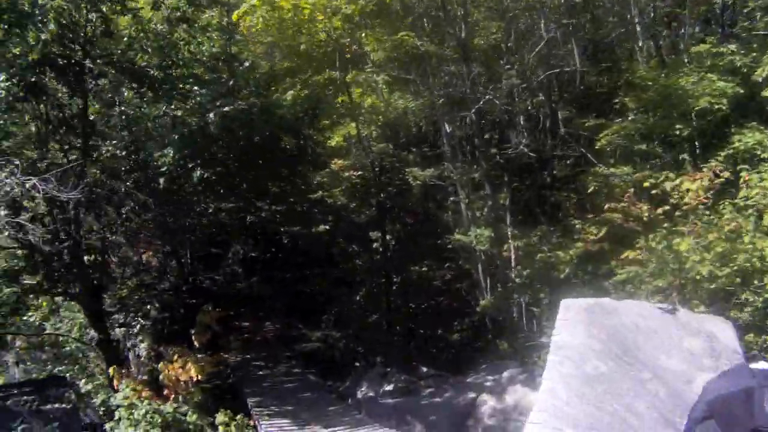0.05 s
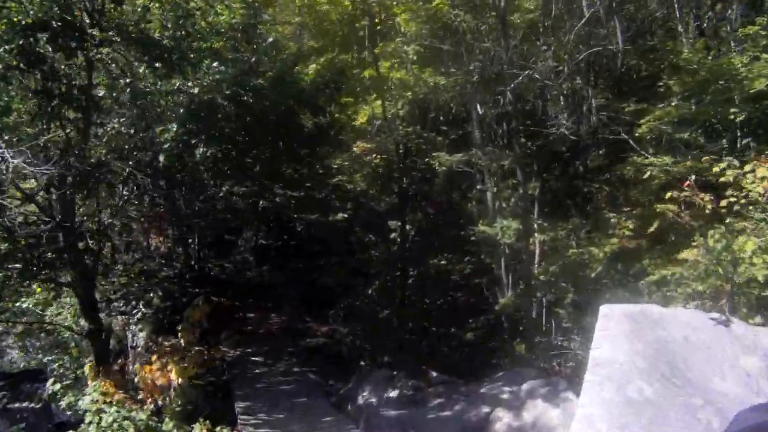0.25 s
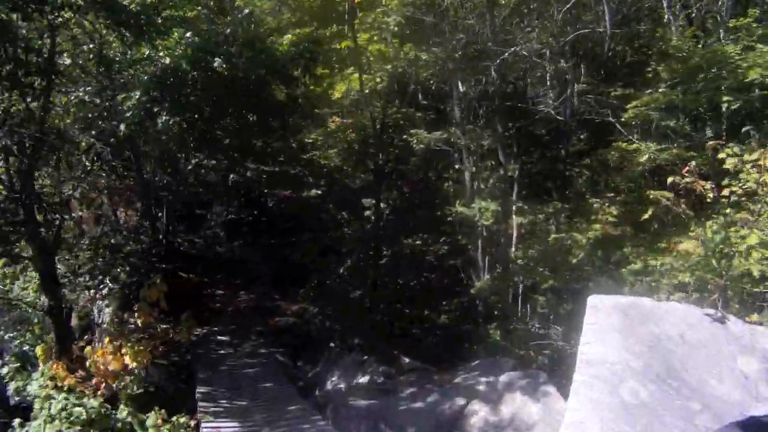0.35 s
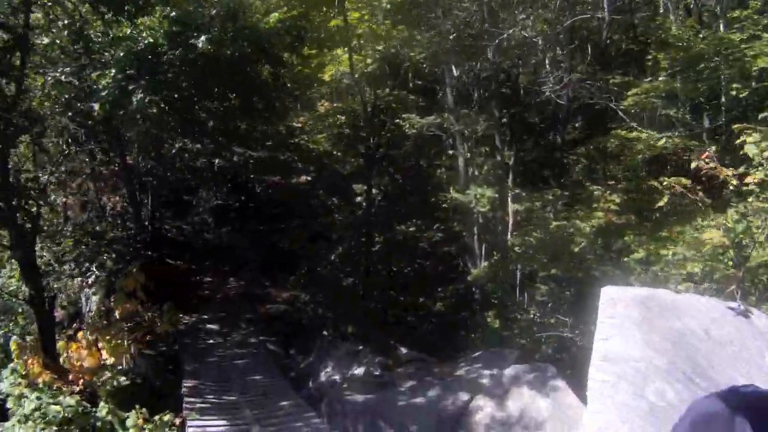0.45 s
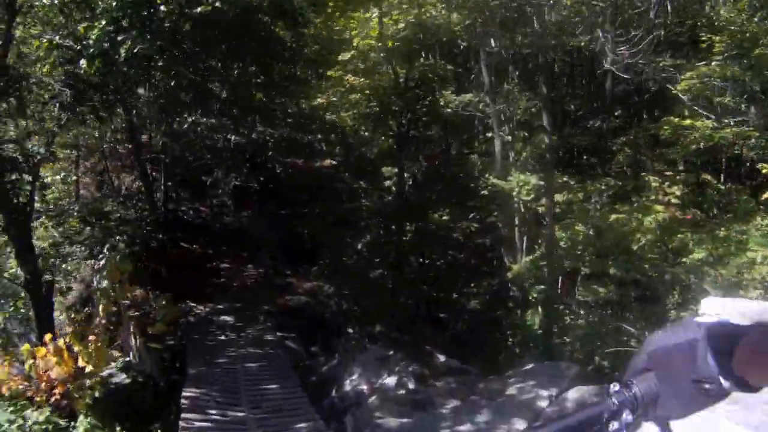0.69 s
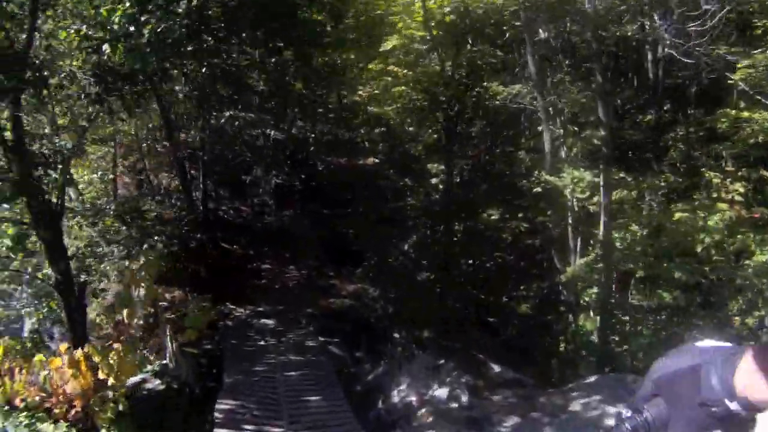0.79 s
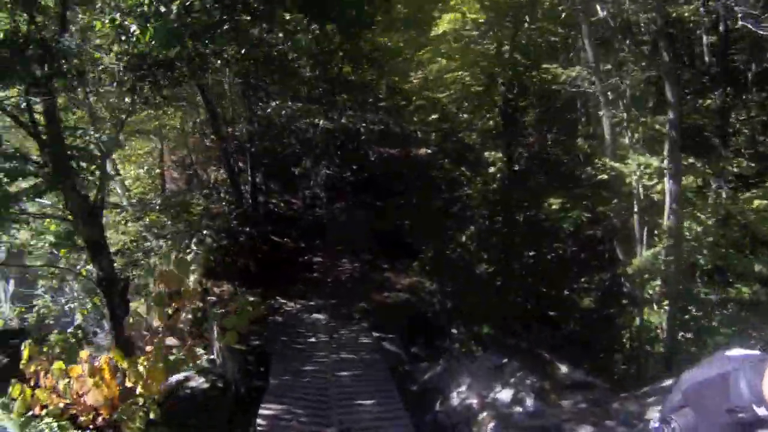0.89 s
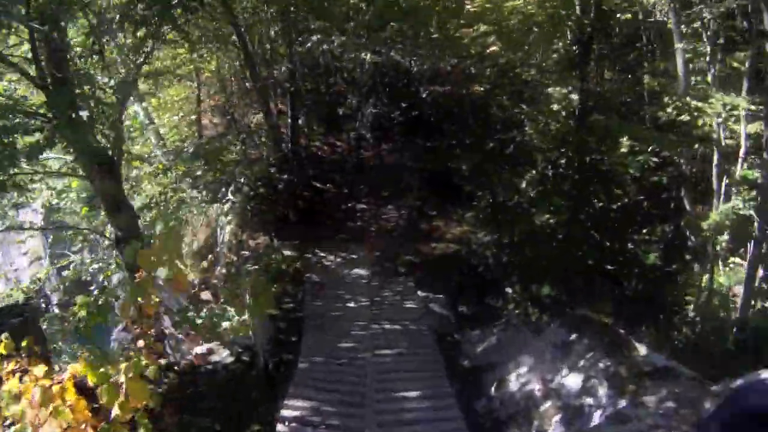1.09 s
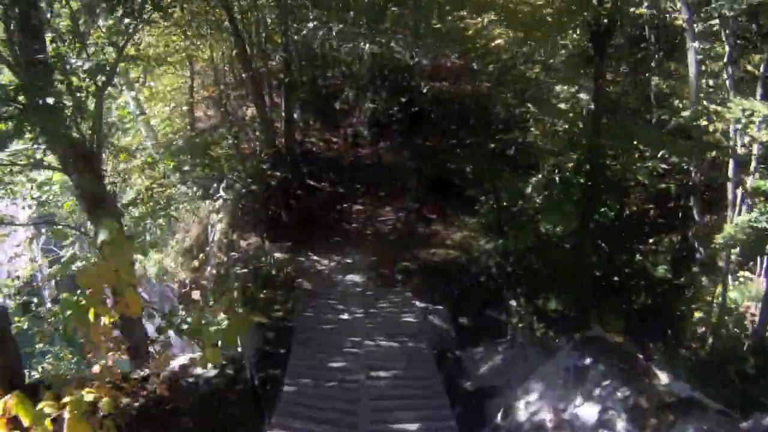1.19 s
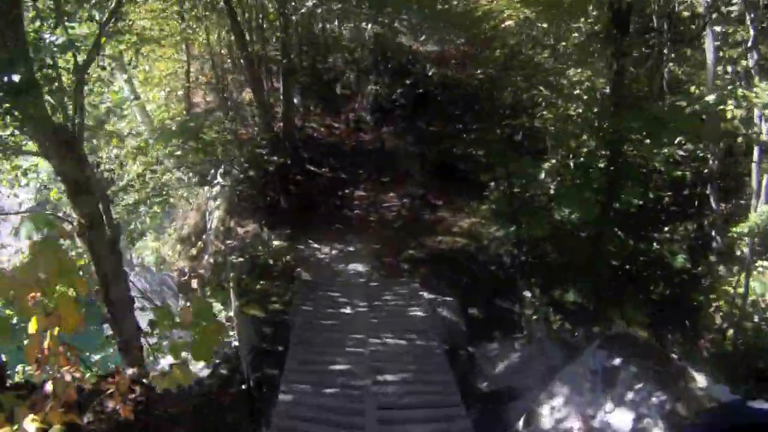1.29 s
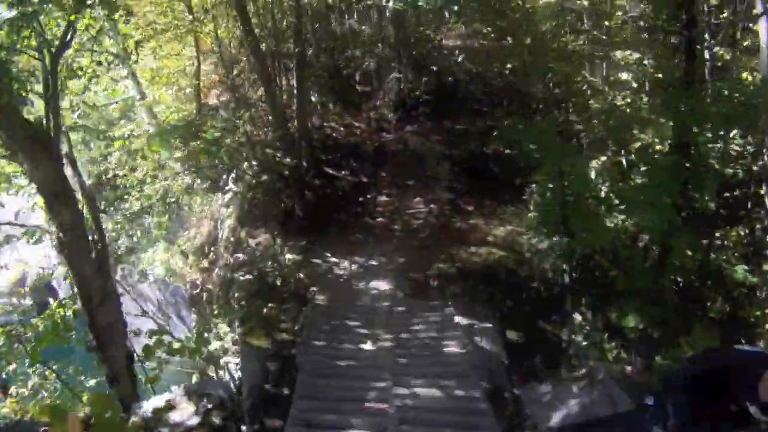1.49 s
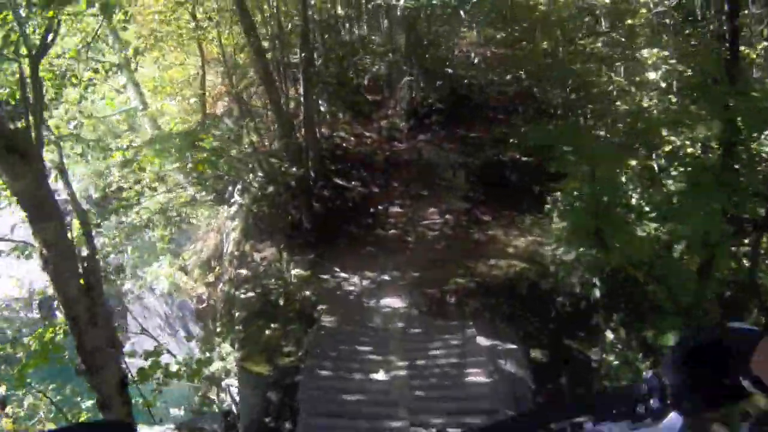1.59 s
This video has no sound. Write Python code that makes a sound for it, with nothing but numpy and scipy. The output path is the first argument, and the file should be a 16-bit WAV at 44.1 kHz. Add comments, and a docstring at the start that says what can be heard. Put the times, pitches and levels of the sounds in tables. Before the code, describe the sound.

Mountain bike tyres rush and crunch in surges over a rocky trail, heard close and slightly boxy, with wind and vibration rumbling underneath. Two deep thumps hit the microphone at about 0.3 and 0.4 seconds. Dull knocks and small ticks rattle from 0.7 seconds on. Around 1.3 seconds the tyres surge with bright cracks and a chain slap, then roll on more softly until about 1.6 seconds.

```python
"""Mountain bike tyres rush and crunch in surges over a rocky forest trail.
The microphone rides close, in a plastic camera case on the rider, and the case colours the sound.
The tread scuffs on rock, grit and chain tick, the chain slaps the frame and the camera mount knocks.
Right at the microphone, two bumps thump the case; wind and the shaking mount rumble in the bass."""
import sys
import numpy as np
from scipy import signal
from scipy.fft import rfft, irfft, next_fast_len
from scipy.io import wavfile

SR = 44100
rng = np.random.default_rng(int(sys.argv[2]) if len(sys.argv) > 2 else 0)


def wrap_up_sound(samples):
    """Save the sound to the file named by the first command line argument, as 16-bit audio."""
    columns = np.atleast_2d(samples).T
    # keep every value between -1 and 1, then stretch to whole-number steps
    tamed = np.clip(columns, -1, 1)
    steps = np.round(tamed * 32767).astype(np.int16)
    wavfile.write(sys.argv[1], SR, steps)


N = 72765
TIME = np.arange(N) / SR

# resonances of the camera mount: f/Hz, level/dB, t60/s
MOUNT_MODES = [(1177, -3.5, 0.041), (1304, 1, 0.025), (2150, -0.5, 0.034), (2270, -8.5, 0.017),
               (2420, -1, 0.013), (3740, -19, 0.035), (8160, -17.5, 0.034), (9840, -8, 0.032),
               (10740, -12.5, 0.039), (13500, -8.5, 0.019), (15200, -17, 0.023)]


def tyres(grains_per_s=1300, grain_spread_db=5, grit_db=-2, flutter_db=2.3, mount_db=-6):
    """Below the rider, smooth rush and crunching grit swell together and keep the mount ringing faintly."""
    # surges of the tyres on the ground: t/s, level/dB
    surges = [(0, -54.5), (.03, -61.5), (.07, -61), (.11, -59.5), (.14, -60.5), (.17, -56), (.208, -54.5),
              (.228, -61), (.27, -62.5), (.32, -63), (.36, -57), (.41, -58), (.44, -62), (.51, -70),
              (.535, -62.5), (.66, -66.5), (.70, -59), (.732, -57), (.78, -65.5), (.83, -63.5),
              (.87, -59.5), (.925, -60), (1.0, -65.5), (1.08, -61.5), (1.18, -65.5), (1.235, -64.5),
              (1.26, -47), (1.29, -55.5), (1.32, -56.5), (1.36, -54.5), (1.39, -59.5), (1.425, -63.5),
              (1.6, -63.5), (1.65, -62.5)]
    # tyre spectrum as heard inside the case: f/Hz, level/dB
    spectrum = [(250, -2), (380, 1.5), (520, -8), (800, -6), (1030, -4.5), (1250, 1.5), (1620, -7),
                (2120, 2.5), (2500, -0.5), (2780, -6), (3000, -3), (3350, -10.5), (3700, -2.5),
                (4300, -15.5), (5200, -17.5), (5750, -34), (6100, -36), (6800, -19), (7400, -24),
                (8350, -11), (8800, -17.5), (9850, -10.5), (10300, -26), (10700, -26.5), (11300, -25.5),
                (12700, -25.5), (13300, -29), (13650, -19), (14200, -14.5), (15200, -16)]
    swell = level(surges)
    grain_db = grain_spread_db * np.minimum(rng.exponential(1, N), 4)
    grains = from_db(grain_db) * rng.choice([-1, 1], N)
    grit = rms_one(grains * (rng.random(N) < grains_per_s / SR))
    rush = rng.standard_normal(N) * from_db(flutter_db * drift(rate_hz=59))
    ground = colour(swell * (rush + from_db(grit_db) * grit), spectrum)
    mount_ring = rms_one(strike(rng.standard_normal(N), MOUNT_MODES))
    return ground + from_db(mount_db) * swell * mount_ring


def tread_scuffs():
    """Knobs of the tread rasp briefly on rock."""
    # scuffs: t/s, level/dB, length/s
    scuffs = [(0.072, -50.5, 0.013), (0.101, -54.5, 0.017), (0.198, -53, 0.028), (0.355, -52.5, 0.013)]
    # spectrum of the rasp: f/Hz, level/dB
    spectrum = [(1000, -17), (1700, -11), (2130, 11.5), (2600, -15), (3700, -14), (6000, -37), (8500, -22),
                (9850, -9.5), (11500, -33), (14200, -10.5)]
    envelope = sum(from_db(db) * lobe(s, length_s) for s, db, length_s in scuffs)
    return envelope * noise(spectrum)


def grit_and_chain_ticks(decay_s=0.003, tail_s=0.011, tail_db=-15, gain_db=-4.5):
    """Grit and chain give bright cracks with a faint tail."""
    # ticks: t/s, relative level/dB
    ticks = [(0.01, -46), (0.203, -54), (.423, -60), (.833, -54), (0.8625, -45.5), (1.04, -52),
             (1.266, -39.5), (1.276, -51), (1.2862, -44.5), (1.335, -43.5), (1.34, -49), (1.347, -52),
             (1.441, -55), (1.553, -52)]
    # spectrum of a tick: f/Hz, level/dB
    spectrum = [(400, -0.5), (1500, -3.5), (2400, 1), (3700, 0), (4300, -3.5), (5000, 2), (6050, -10),
                (7000, 0), (7700, -8), (9600, -10), (12000, -44), (14500, -10.5)]
    envelope = sum(from_db(db) * (fade(s, decay_s) + from_db(tail_db) * fade(s, tail_s))
                   for s, db in ticks)
    return from_db(gain_db) * colour(envelope * rng.standard_normal(N), spectrum)


def chain_slaps():
    """The chain slaps the frame and sets it ringing."""
    # slaps: t/s, relative level/dB, brightness/Hz, chatter decay/s
    slaps = [(1.3328, -34.5, 11000, 0.0011), (1.3445, -50, 9000, .005)]
    # resonances of the frame: f/Hz, level/dB, t60/s
    frame_modes = [(1311, 2.5, 0.052), (1999, -8.5, 0.059), (2385, 2.5, 0.047), (3030, -3, 0.045),
                   (3110, -0.5, 0.029), (3750, -1.5, 0.032), (4280, -7, 0.0235), (8400, -6, 0.028),
                   (8850, -15, .025), (9130, -7, 0.042), (10660, -10, 0.048), (12860, -12, 0.028),
                   (14200, -16, .02), (14400, -2, .02)]
    return strike(blows(slaps), frame_modes)


def mount_knocks():
    """Dull knocks ring the mount, next to the microphone."""
    # knocks: t/s, relative level/dB, brightness/Hz, chatter decay/s
    knocks = [(.0765, -48, 9000, 0.0032), (.723, -40.5, 5000, .012), (.845, -43, 700, 0.014),
              (.922, -38, 700, .012), (1.017, -35.5, 6040, 0.0038), (1.0215, -45, 6000, 0.0032),
              (1.195, -46.5, 5160, 0.0033), (1.2412, -29, 700, 0.0061), (1.249, -33, 900, .004)]
    return strike(blows(knocks), MOUNT_MODES)


def case_thumps(roundness=1.87, highpass_hz=42.6, highpass_q=0.72, buzz_hz=11940, buzz_db=-34):
    """A bump's low thump undershoots through the microphone's high-pass, and the case rings thinly."""
    # bumps against the case: t/s, push level/dB, direction/sign, push length/s
    bumps = [(0.2965, -13.0, 1, 0.0045), (0.3994, -16, -1, 0.00548)]
    push, clicks = np.zeros(N), np.zeros(N)
    for s, db, direction, push_s in bumps:
        push += direction * from_db(db) * lobe(s, push_s) ** roundness
        clicks += from_db(db + buzz_db) * click(s)
    buzz_band = signal.butter(2, [buzz_hz - 400, buzz_hz + 400], "band", fs=SR, output="sos")
    buzz = signal.sosfilt(buzz_band, ring(clicks, buzz_hz, t60=0.025))
    w = 2 * np.pi * highpass_hz
    mic_highpass = signal.bilinear([1, 0, 0], [1, w / highpass_q, w * w], SR)
    return signal.lfilter(*mic_highpass, push) + buzz


def wind(waver_db=0.6, air_db=-65):
    """Deep gusts buffet the case over a faint, steady rush of air."""
    # gusts on the case: t/s, level/dB
    gusts = [(0, -39), (.07, -52.5), (.25, -53), (.34, -47), (.45, -52), (.57, -52.5), (.635, -53),
             (.68, -51), (.72, -47.5), (.79, -49), (.85, -58), (.91, -43), (.99, -50), (1.07, -47),
             (1.13, -53), (1.21, -47), (1.28, -57), (1.33, -52.5), (1.44, -50.5), (1.6, -57), (1.65, -68)]
    # spectra of the gusts and of the steady air: f/Hz, level/dB
    gust_spectrum = [(10, -7.5), (20, 1.5), (30, 5.5), (48, -11), (80, -22.5), (200, -18.5), (800, -64)]
    air_spectrum = [(200, -1.5), (350, 4), (520, -5.5), (900, -3.5), (1250, -2), (1650, -16.5),
                    (2200, -13.5), (4000, -13.5), (5200, -19), (6000, -27), (7000, -19.5), (9000, -19.5),
                    (12000, -31.5), (15000, -35)]
    waver = from_db(-waver_db * drift(rate_hz=5.8))
    buffeting = level(gusts) * waver * noise(gust_spectrum)
    return buffeting + from_db(air_db) * noise(air_spectrum)


def mount_rumble():
    """The mount shudders over rough ground and wobbles after each jolt."""
    # shudder of the mount: t/s, level/dB
    shudder = [(0, -56.5), (.135, -63), (.155, -52), (.205, -44.5), (.225, -63.5), (.34, -54.5), (.38, -53),
               (.44, -56.5), (.54, -59), (.58, -62), (.69, -61), (.73, -47.5), (.765, -58.5), (.83, -60.5),
               (.92, -55), (.99, -59.5), (1.04, -52), (1.13, -64.5), (1.25, -53.5), (1.345, -57.5),
               (1.38, -46), (1.42, -60.5), (1.6, -67), (1.65, -49.5)]
    # spectrum of the shudder: f/Hz, level/dB
    spectrum = [(35, -14.5), (75, 4), (135, -2.5), (230, -16.5), (340, -6.5), (480, -15.5), (900, -40.5),
                (2000, -60)]
    # jolts and their wobble: t/s, level/dB, f/Hz, t60/s
    jolts = [(.148, -37.5, 121, 0.063), (.168, -37, 148, 0.073), (0.62, -38, 37.5, 0.12),
             (0.729, -41, 100, 0.085), (.787, -41.5, 89.3, .12), (1.367, -39.5, 128, 0.044)]
    wobble = sum(from_db(db) * ring(click(s), hz, t60) for s, db, hz, t60 in jolts)
    return wobble + level(shudder) * noise(spectrum)


def blows(rows, touches_per_s=2000, chatter_db=-11.5):
    """Force of blows, each with a short chatter of weaker touches; soft blows lose the treble."""
    force = np.zeros(N)
    for s, db, bright_hz, decay_s in rows:
        touches = (rng.random(N) < touches_per_s / SR) * rng.choice([-1, 1], N)
        contact = click(s) + from_db(chatter_db) * touches * fade(s, decay_s)
        softness = np.exp(-2 * np.pi * bright_hz / SR)
        force += from_db(db) * signal.lfilter([1 - softness], [1, -softness], contact) / 2
    return force


def strike(force, modes):
    """A force rings a set of modes, alternating in polarity."""
    return sum((-1) ** k * from_db(db) * ring(force, hz, t60) for k, (hz, db, t60) in enumerate(modes))


def ring(force, hz, t60):
    """One resonance: a unit click starts a decaying sine of height 1."""
    r = from_db(-60 / (t60 * SR))
    w = 2 * np.pi * hz / SR
    return signal.lfilter([0, np.sin(w)], [1, -2 * r * np.cos(w), r * r], force + 1e-18)


def colour(x, spectrum):
    """Minimum-phase filter of unit power gain, shaped by rows of f/Hz, level/dB."""
    size = next_fast_len(N + SR // 2, real=True) * 2
    hz, db = np.transpose(sorted(spectrum))
    bin_hz = np.arange(size // 2 + 1) * SR / size
    gain = rms_one(from_db(np.interp(np.log(bin_hz + 1), np.log(hz), db)))
    cepstrum = irfft(np.log(gain))
    cepstrum[1:size // 2] *= 2  # folding onto positive time makes the filter causal
    cepstrum[size // 2 + 1:] = 0
    return irfft(rfft(x, size) * np.exp(rfft(cepstrum)))[:N]


def noise(spectrum):
    """Coloured noise with unit rms."""
    return rms_one(colour(rng.standard_normal(N), spectrum))


def drift(rate_hz):
    """Smooth random wander with a spread of about 1."""
    r = np.exp(-2 * np.pi * rate_hz / SR)
    wander = signal.lfilter([1], [1, -2 * r, r * r], rng.standard_normal(N + SR))
    return rms_one(wander)[SR:]


def level(rows):
    """Gain over time from rows of t/s, level/dB."""
    return from_db(np.interp(TIME, *np.transpose(rows)))


def click(s):
    """A unit click at time s."""
    return 1.0 * (np.arange(N) == int(s * SR))


def fade(s, decay_s):
    """Sudden start at time s, exponential decay."""
    return (TIME >= s) * np.exp(-np.abs(TIME - s) / decay_s)


def lobe(s, length_s):
    """Half a sine starting at time s."""
    return np.sin(np.pi * np.clip((TIME - s) / length_s, 0, 1))


def from_db(db):
    """Decibels to gain."""
    return 10 ** (np.asarray(db) / 20)


def rms_one(x):
    """Scale to unit rms."""
    return x / np.sqrt(np.mean(x ** 2) + 1e-20)


def scene():
    """Bike, case and wind, all close to the one microphone on the rider."""
    rolling = tyres() + tread_scuffs()
    clatter = mount_knocks() + chain_slaps() + grit_and_chain_ticks()
    return (rolling + clatter + case_thumps() + wind() + mount_rumble())[None]


def record(dry, cutoff_hz=15200):
    """The top of the microphone signal is cut steeply."""
    return signal.sosfilt(signal.ellip(10, .3, 70, cutoff_hz, fs=SR, output="sos"), dry)


dry = scene()
out = record(dry)
wrap_up_sound(out)
```